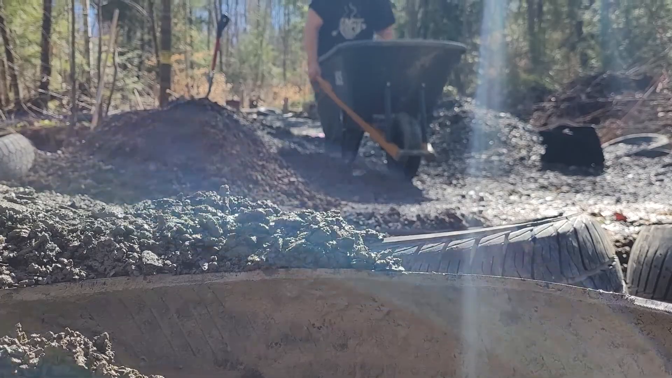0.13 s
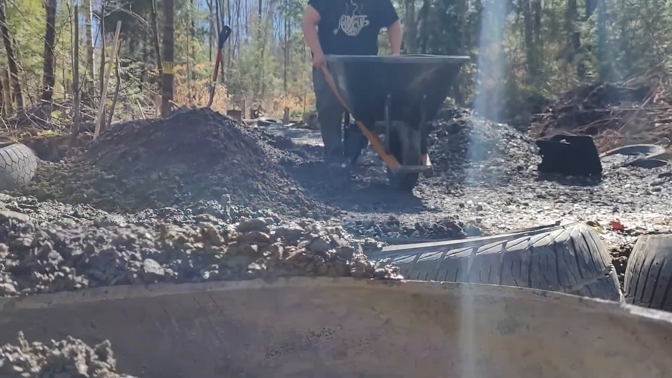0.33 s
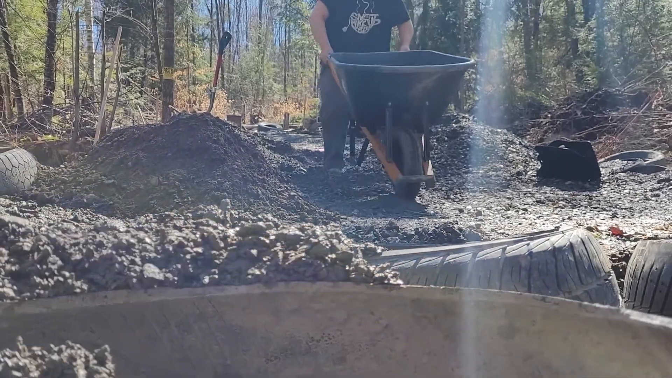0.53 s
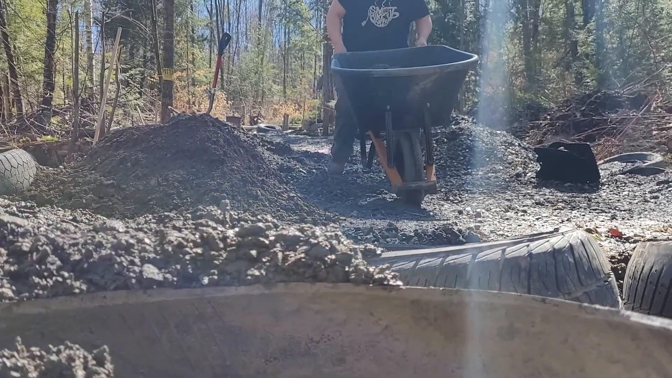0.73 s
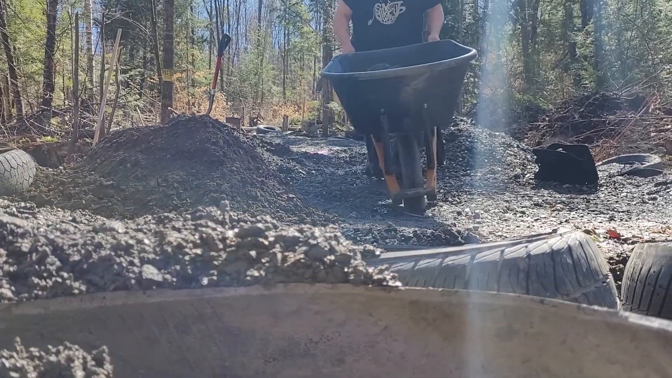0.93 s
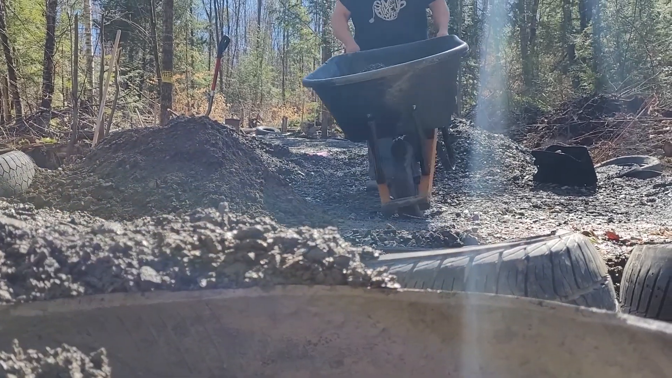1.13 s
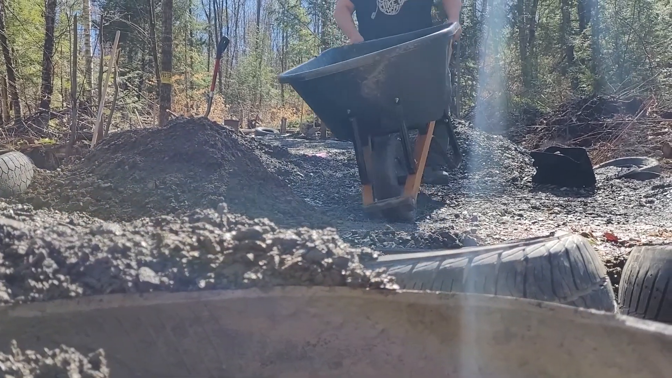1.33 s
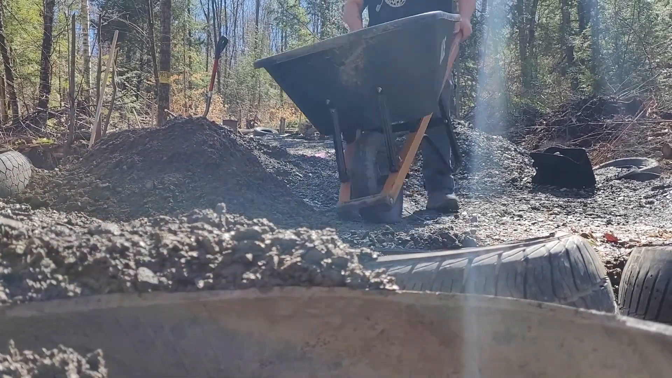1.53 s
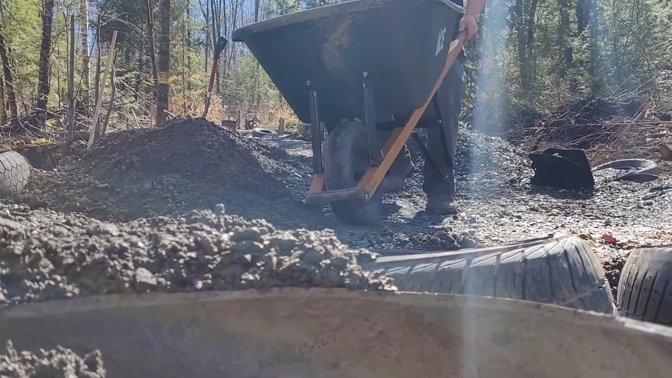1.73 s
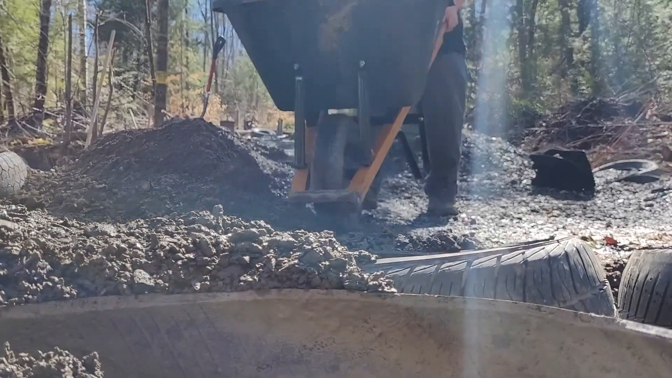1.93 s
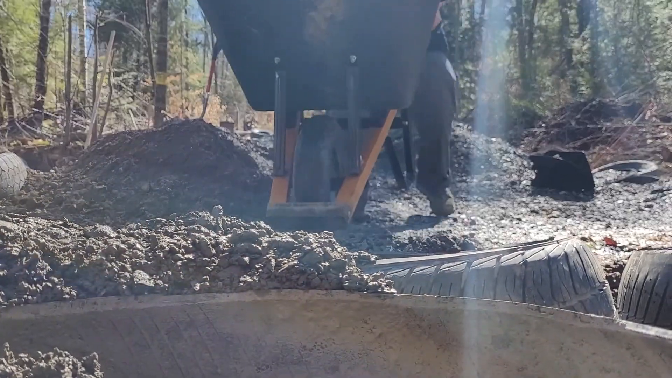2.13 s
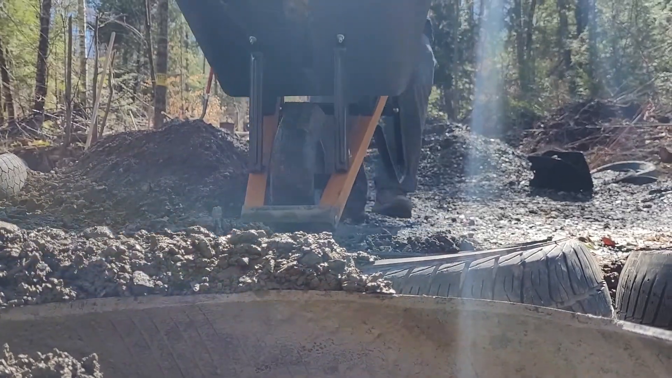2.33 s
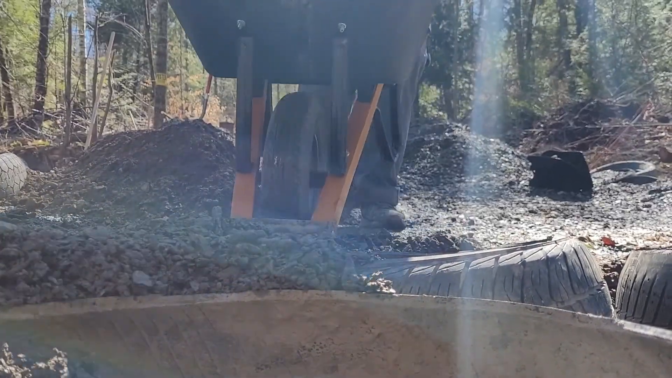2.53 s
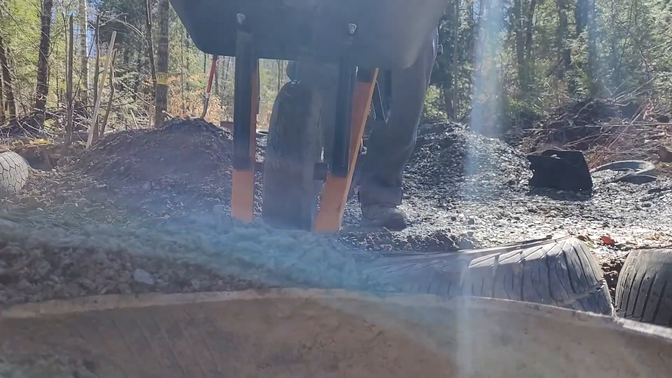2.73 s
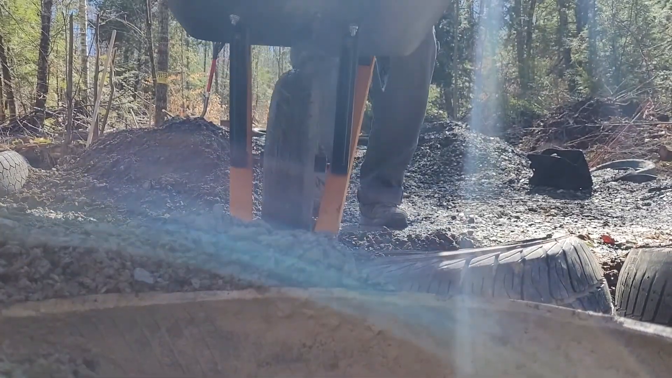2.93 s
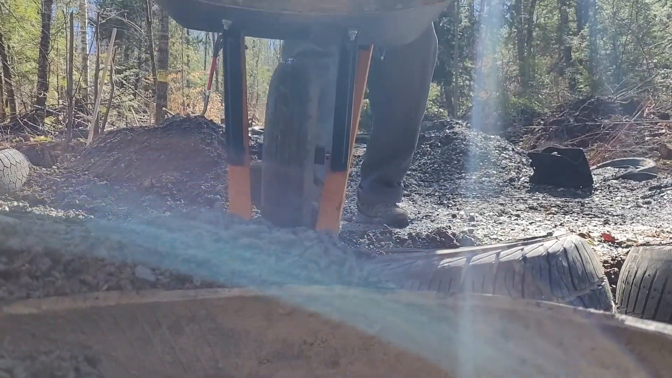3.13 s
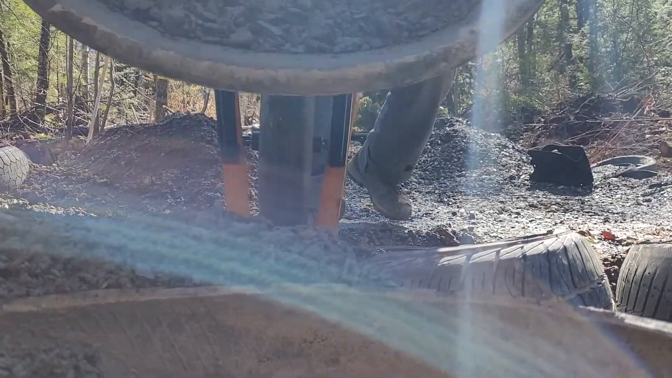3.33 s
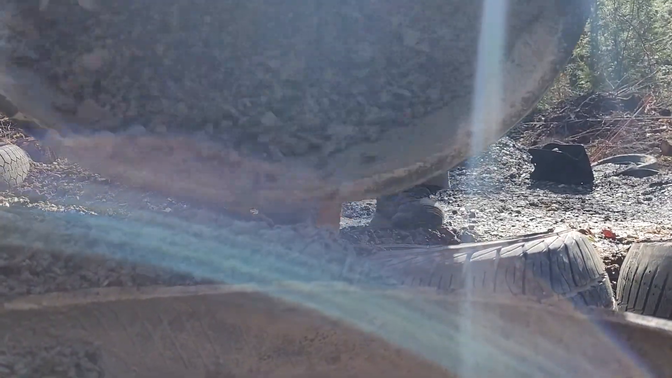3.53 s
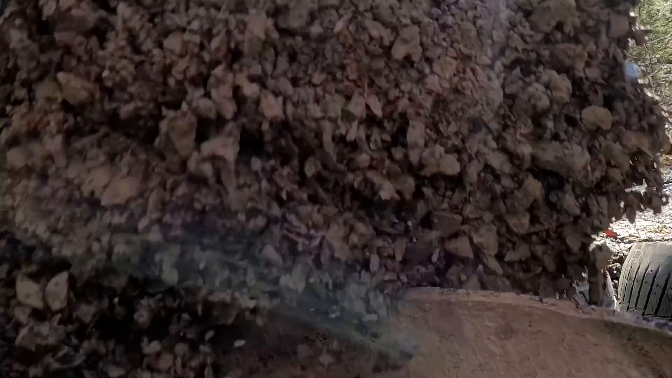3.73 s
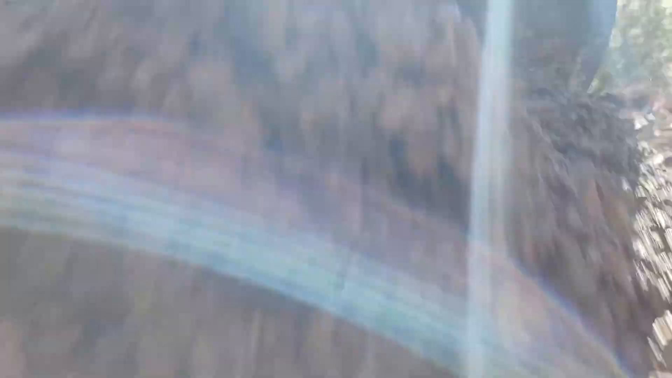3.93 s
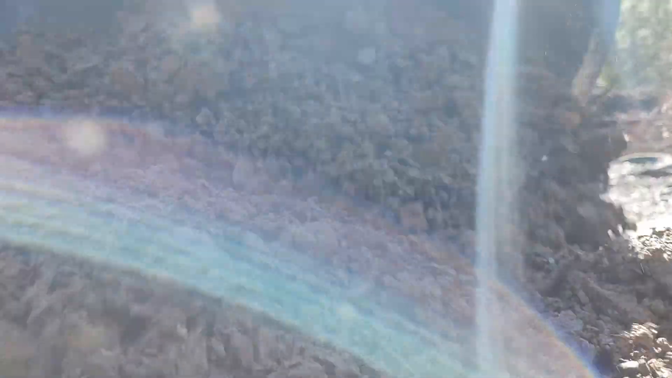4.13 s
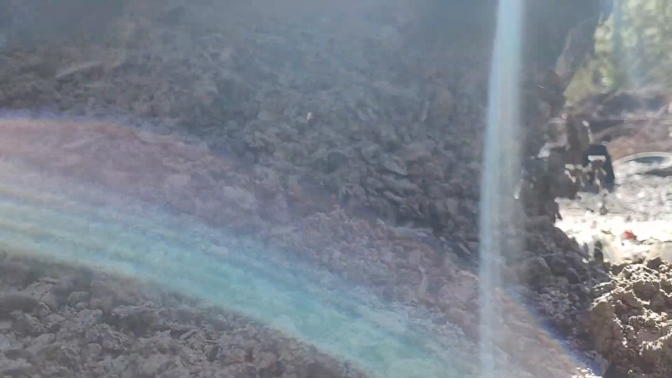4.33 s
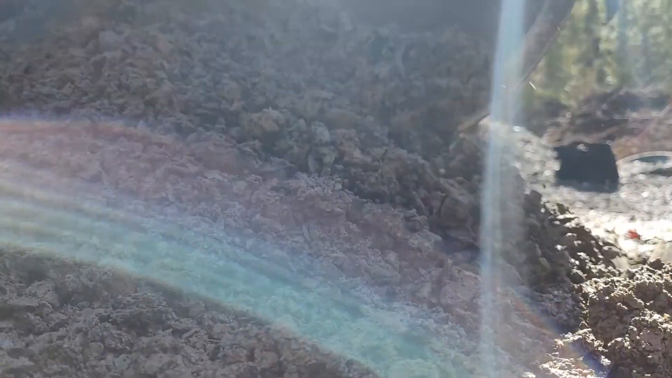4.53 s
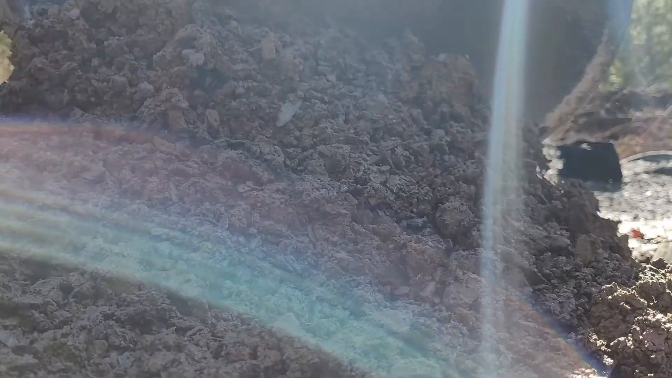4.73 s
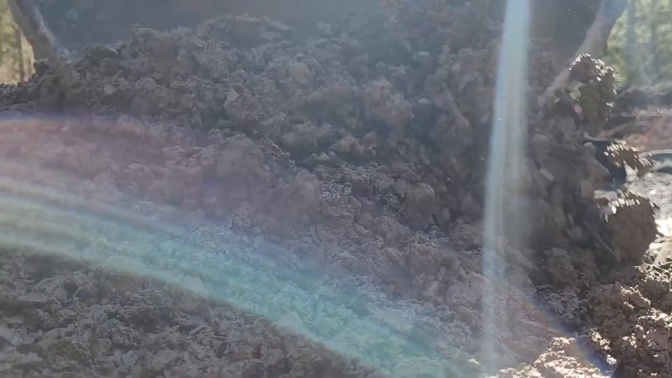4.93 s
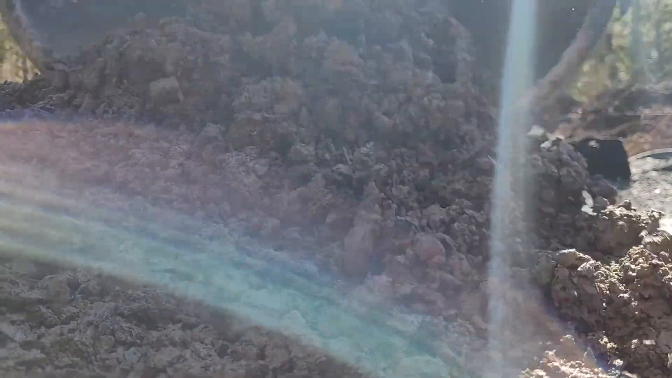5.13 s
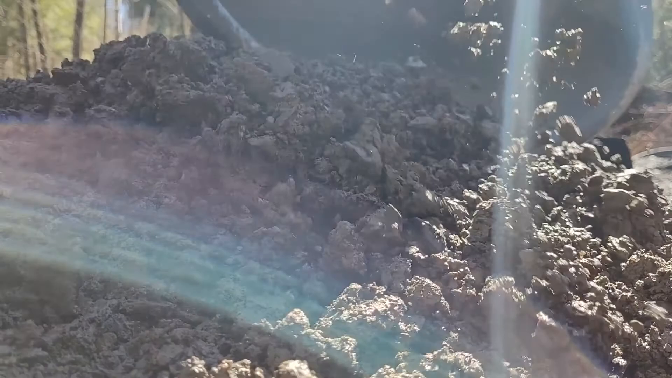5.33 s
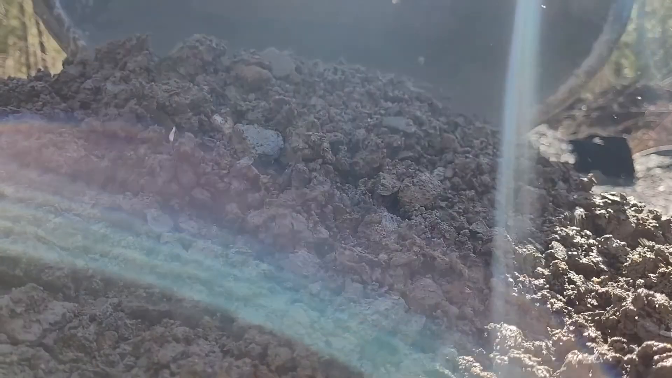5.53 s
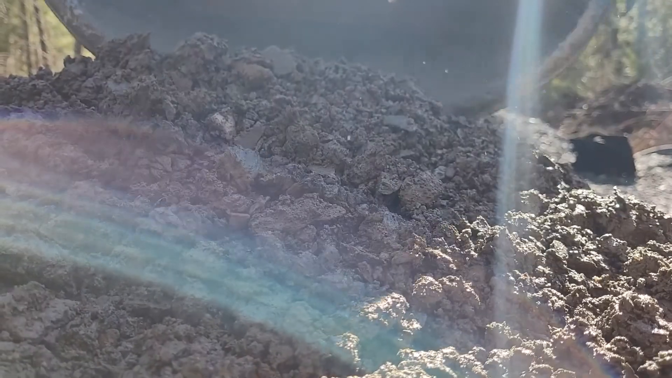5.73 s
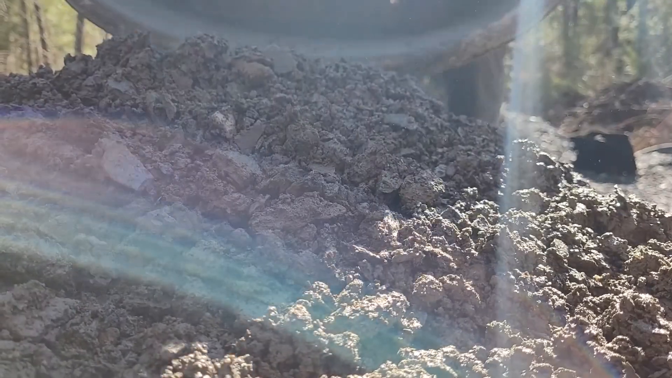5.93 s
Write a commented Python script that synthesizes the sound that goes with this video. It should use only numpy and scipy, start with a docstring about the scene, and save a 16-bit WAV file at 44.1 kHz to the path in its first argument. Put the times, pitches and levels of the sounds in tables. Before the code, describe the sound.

A loaded wheelbarrow crunches closer over gravel, then tips out stony soil with a loud clattering rush and is shaken empty.

```python
"""In quiet woods, a loaded wheelbarrow crunches over gravel towards a phone lying by a heap.
Single stones crack under tyre and boots while the load rattles in the plastic tub.
At about 3.5 s the barrow tips and pours: stones clatter, grit hisses, the tub drums, soil thuds down.
From about 4.3 s it is shaken empty in short slides, and a last trickle follows.
The phone's two microphones sit near the ground and each colours the treble differently."""
import sys
import numpy as np
from scipy import signal
from scipy.fft import rfft, irfft, next_fast_len
from scipy.io import wavfile

SR = 44100
rng = np.random.default_rng(int(sys.argv[2]) if len(sys.argv) > 2 else 0)


def file_out(sig):
    """Save sig as 16-bit WAV at sys.argv[1]."""
    # one column per channel
    cols = np.atleast_2d(sig).T
    # limit, then scale
    lim = np.clip(cols, -1, 1)
    pcm = np.round(lim * 32767).astype(np.int16)
    wavfile.write(sys.argv[1], SR, pcm)


N = 267951
TIME = np.arange(N) / SR
TIPPING_S = (3.45, 5)  # start and end of the change from upright to nose down

# the notes (modes) at which the upright, loaded tub rings: f/Hz, width/Hz, level/dB
TUB_MODES = [(145, 59, 19), (296, 39, 3), (859, 103, -4), (1406, 80, -5.5), (2230, 28, -28),
             (3150, 370, -3)]


def undb(db):
    """Turn decibels into a factor to multiply by."""
    return 10 ** (np.asarray(db) / 20)


def unit(x):
    """Scale a sound to an average power of 1."""
    return x / np.sqrt(np.mean(x ** 2))


def curves(rows):
    """Join the values in each column of a table by straight lines in time."""
    times, *columns = np.array(rows).T
    return np.array([np.interp(TIME, times, column) for column in columns])


def colour(x, points, modes=()):
    """Filter a sound by a curve of (f/Hz, level/dB) points, with ringing notes standing on top."""
    hz = np.maximum(np.fft.rfftfreq(8192, 1 / SR), 1)
    point_hz, point_db = np.array(points).T
    gain = undb(np.interp(np.log(hz), np.log(point_hz), point_db))
    for mode_hz, width, db in modes:
        if point_hz[1] <= mode_hz <= point_hz[-2]:
            gain = np.hypot(gain, undb(db) / (1 + (2 * (hz - mode_hz) / width) ** 2))
    # make the filter ring only after a knock, never before it
    cepstrum = irfft(np.log(gain))
    cepstrum[1:4096] *= 2
    cepstrum[4097:] = 0
    response = irfft(np.exp(rfft(cepstrum)))
    return signal.oaconvolve(x, response[None], axes=1)[:, :N]


def stereo_noise(alike, turn=0.):
    """Left and right noise; the share `alike` is common, its phase shifted `turn` radians on the left."""
    shared, left, right = rng.standard_normal((3, N))
    turned = irfft(rfft(shared, next_fast_len(N)) * np.exp(1j * turn))[:N]
    return np.sqrt(alike) * np.array([turned, shared]) + np.sqrt(1 - alike) * np.array([left, right])


def grains(rate, spread_db, tail_s, bed):
    """Loudness outline of uneven random knocks, `rate` a second, over a steady share `bed`."""
    lands = rng.random(N) < rate / SR
    size = undb(2 * spread_db * rng.exponential(size=N).clip(0, 5))
    power = lands * size / size.mean() * SR / rate
    decay = np.exp(-1 / (tail_s * SR))
    return np.sqrt(bed + (1 - bed) * signal.lfilter([1 - decay], [1, -decay], power))


def surges(table, rise_s, fall_s, round_top):
    """Power that swells, holds and fades; it is 20 dB down rise_s before and fall_s after the hold."""
    power = 0
    for start, length, *levels_db in table:
        away = np.maximum(start - TIME, 0) / rise_s + np.maximum(TIME - start - length, 0) / fall_s
        power = power + np.outer(undb(levels_db), undb(-20 * away ** round_top)) ** 2
    return power


def blows(table, ring_db, alike, rise_s, t60=None, q=None):
    """Noise bursts that set the tub ringing; each fades 60 dB in t60 s, and higher q is more pitched."""
    t = np.arange(8192) / SR
    out = np.zeros((2, N + len(t)))
    noises = rng.standard_normal((len(table), 3, len(t)))
    for (start, db, hz, pan_db, *own), noise in zip(table, noises):  # pan is left minus right
        push = np.sqrt(alike) * noise[0] + np.sqrt(1 - alike) * noise[1:]
        push = push * 1000. ** (-t / (t60 or own[0])) * np.minimum(t / rise_s, 1)
        sharpness = max(q or own[1], .2 + 2.6 * hz / SR)
        for _ in range(2):  # twice, to cut more away from the pitch
            push = signal.lfilter(*signal.iirpeak(hz, sharpness, SR), push)
        ring = sum(undb(mode_db) * signal.lfilter(*signal.iirpeak(f, f / width, SR), push)
                   for f, width, mode_db in TUB_MODES)
        hit = push + undb(ring_db) * ring
        hit /= np.abs(hit).max(axis=1, keepdims=True)
        first = int(start * SR)
        out[:, first:first + len(t)] += undb(db + np.array([[pan_db], [-pan_db]]) / 2) * hit
    return out[:, :N]


def woods():
    """The faint, steady hush of the woods."""
    # tone of the hush: f/Hz, level/dB
    hush = [(30, 1), (100, -22), (400, -4.5), (1500, -15), (5000, -22), (16000, -45)]
    return unit(colour(stereo_noise(0.3), hush)) * undb(-63.5)


def grit_ticks():
    """Grains of grit land next to the phone with tiny, bright ticks."""
    # landings: t/s, peak/dB, f/Hz, pan/dB
    ticks = [(0.5034, -51, 7400, 6.0), (0.7015, -46, 8160, 11), (0.9303, -42, 7740, 9),
             (1.0091, -42, 5600, 10), (1.1812, -37, 8190, 6.5), (1.1902, -32, 6650, 7),
             (1.3354, -40, 9700, 10), (1.4676, -34, 9430, 8), (1.488, -35, 5870, -2),
             (1.6183, -35, 6200, 1), (1.8285, -33, 7950, 7.0), (1.836, -30.5, 5770, 6),
             (1.9639, -34, 6000, 4.5), (2.0512, -39, 7080, 4.0), (2.297, -33, 5520, 3),
             (2.4523, -38, 7610, 4.5), (2.596, -32, 5700, 6.5), (2.9911, -42, 6160, 5.5),
             (3.009, -30, 6750, -1), (3.0154, -30, 14000, 0), (3.2313, -33, 7100, -1),
             (3.26, -30, 5470, 4.5), (3.301, -28.5, 7300, 2), (3.384, -30, 8050, 4.5),
             (3.412, -27, 5730, 4.5), (3.7623, -21, 5780, 7.5), (4.179, -25, 6970, -4.0),
             (4.1876, -23, 7540, -10), (4.2166, -26, 7100, -16), (4.2264, -29, 7400, -10),
             (4.2453, -26, 12000, -10), (4.2634, -35, 13600, -4), (4.3889, -36, 7300, -5),
             (4.906, -41, 5520, 1), (5.0973, -36, 12000, 4), (5.1163, -35, 5710, 1.5),
             (5.2525, -37, 12300, 3.5), (5.435, -30, 11600, 4), (5.508, -32, 6110, 5.5),
             (5.6181, -29.5, 11900, 7), (5.654, -42, 7870, 1.5), (5.7977, -43, 6660, -11),
             (5.826, -44, 13400, 3.0), (6.0135, -42, 7230, 4)]
    return blows(ticks, t60=0.017, q=1.04, ring_db=-26, alike=0.19, rise_s=0.00033)


def stone_snaps():
    """A single stone close by gives a very short, dry snap."""
    # snaps: t/s, peak/dB, f/Hz, pan/dB, t60/s, sharpness q
    snaps = [(.367, -22, 1500, -8, 0.0031, .45), (4.047, -15, 1270, -21, 0.0053, 1.2),
             (5.335, -12, 3580, 14, .006, 1.2)]
    return blows(snaps, ring_db=10, alike=1.0, rise_s=0.00053)


def low_blows():
    """Dull knocks hit tub and ground, and heavy masses land with a deeper, longer thud."""
    # dull knocks: t/s, peak/dB, f/Hz, pan/dB, t60/s
    thumps = [(0.38, -39.5, 272, 2.5, 0.1), (0.574, -50, 149, 0.5, 0.068), (0.67, -43.5, 266, 0.0, 0.046),
              (0.869, -45, 254, 2.0, 0.075), (0.968, -43.5, 170, 1.5, 0.059), (1.08, -33, 218, 1.5, 0.068),
              (1.267, -35.5, 192, 2, 0.036), (1.452, -31, 292, 6, 0.11), (1.55, -35, 143, 3, 0.09),
              (1.577, -39, 133, 0, 0.089), (2.061, -32, 400, 5, 0.09), (2.235, -40, 301, 7.5, 0.06),
              (2.26, -30.5, 272, -2, 0.066), (2.448, -42, 132, -1, 0.075), (2.894, -26.5, 288, 4, 0.037),
              (2.984, -32.5, 323, 6, 0.11), (3.103, -26.5, 285, 8, 0.068), (3.26, -24, 280, 6, 0.083),
              (3.779, -9.5, 297, 7, 0.06), (3.845, -34, 374, -5, 0.084), (4.033, -14.5, 266, 17, 0.069),
              (4.18, -23, 240, -2, 0.087), (4.623, -35, 159, 2.0, 0.082), (4.719, -28.5, 135, 0, 0.075),
              (4.858, -25, 164, 3, 0.062), (4.953, -34, 147, -6, 0.055), (5.14, -29, 160, 1.5, 0.055),
              (5.275, -12, 136, 1.0, 0.056), (5.471, -16.5, 173, 2.5, 0.066), (5.544, -25, 153, 1.0, 0.052),
              (5.872, -41, 153, 4, 0.075), (5.949, -35.5, 153, 1.0, 0.098)]
    # heavy landings: t/s, peak/dB, f/Hz, pan/dB
    thuds = [(.33, -57, 61, 12), (1.03, -50, 60.4, 3), (1.57, -38, 62.4, 2), (2.06, -42.5, 60, 7),
             (3.09, -38, 62.6, 8), (3.79, -32, 60.4, -6), (4.03, -17.5, 64, 11), (4.07, -23.5, 71.6, 15),
             (5.02, -34, 62.7, 0), (5.18, -25, 63, 5), (5.29, -24.5, 64, 0), (5.47, -24, 60, 2)]
    return (blows(thumps, q=1.94, ring_db=-35, alike=0.69, rise_s=0.005)
            + blows(thuds, t60=0.32, q=1.7, ring_db=-11, alike=1.0, rise_s=0.005))


def stone_cracks():
    """Stones crack under tyre and boots or on the heap."""
    # cracks: t/s, peak/dB, f/Hz, pan/dB, t60/s, sharpness q
    cracks = [(0.181, -47.5, 1450, 4, 0.023, 0.79), (0.382, -32, 1380, 5, 0.03, 0.62),
              (0.552, -43, 1180, 5, 0.032, 1.3), (0.579, -37, 886, 3, 0.061, 0.68),
              (0.617, -37.5, 890, 7, 0.02, 0.77), (0.666, -43, 746, -1, 0.03, 1.2),
              (0.828, -37.5, 2800, -3, 0.038, 2.4), (0.872, -40, 1500, 7, 0.028, 1.2),
              (1.009, -39, 1520, 4, 0.023, 1), (1.036, -25, 1270, 3, 0.02, 0.96),
              (1.076, -28.5, 886, 5, 0.019, 0.8), (1.085, -23, 1410, 2.0, 0.031, 1.6),
              (1.12, -36, 1380, 2.0, 0.025, 1.2), (1.145, -32, 1440, 4, 0.022, 1.2),
              (1.178, -31, 2300, 0.0, 0.025, 1.8), (1.19, -23.5, 1510, 4, 0.025, 0.96),
              (1.267, -24, 2080, -1, 0.026, 1.3), (1.275, -27, 2180, 2.0, 0.028, 0.69),
              (1.338, -30.5, 1580, -2, 0.023, 1.2), (1.456, -25, 1370, 5, 0.042, 2.3),
              (1.466, -25, 1330, 8, 0.025, 2.6), (1.541, -42, 2490, -4, 0.025, 1.3),
              (1.574, -31, 1460, 1.0, 0.034, 0.89), (1.824, -36, 1410, 4, 0.025, 1.2),
              (1.964, -40, 1390, -2, 0.025, 0.88), (2.082, -26.5, 1450, 3.0, 0.041, 1.2),
              (2.119, -31.5, 1420, -3, 0.013, 1.5), (2.168, -30, 1900, 2.0, 0.025, 1.4),
              (2.231, -35, 1430, 2.5, 0.022, 1.8), (2.273, -26, 1010, 5, 0.029, 1.1),
              (2.329, -28.5, 960, 8, 0.025, 1.2), (2.384, -31, 930, 3.5, 0.025, 1),
              (2.491, -30, 2330, -4, 0.024, 2), (2.545, -20.5, 1380, 1.0, 0.01, 1.8),
              (2.595, -36, 3380, -8, 0.025, 1.4), (2.753, -26.5, 1420, 2, 0.02, 1.4),
              (2.774, -30.5, 1320, 2.0, 0.029, 1.4), (2.895, -35, 1220, 1, 0.025, 1),
              (3.008, -36, 3110, 1, 0.021, 1.4), (3.105, -22, 1200, 6, 0.025, 0.44),
              (3.269, -27, 770, 5, 0.038, 0.94), (3.37, -19.5, 1380, 8, 0.016, 0.71),
              (4.317, -21, 851, 2.5, 0.023, 1.2), (5.052, -26.5, 746, 3, 0.044, 1),
              (5.127, -23.5, 890, 4, 0.023, 1.5), (5.364, -20, 785, 0, 0.035, 1),
              (5.451, -39, 848, -1, 0.025, 1.1), (5.481, -16.5, 826, 0, 0.023, 0.69),
              (5.592, -31, 700, 7, 0.038, 2), (5.617, -31, 876, 3, 0.025, 0.66),
              (5.651, -34.5, 905, -6, 0.025, 0.51), (6.035, -39, 759, 1.0, 0.022, 1.1)]
    return blows(cracks, ring_db=4.5, alike=0.72, rise_s=0.0018)


def scrapes(knocks):
    """Gravel rubbing along the tub makes one narrow note sing for each scrape."""
    # scrapes: t/s, length/s, level/dB, f/Hz
    strokes = [(1.03, .16, -52, 1450), (1.315, 0.045, -49.5, 1510), (1.846, 0.13, -48.5, 1410),
               (2.062, .06, -49, 1440), (2.268, 0.078, -46.5, 945), (2.703, 0.052, -49, 1380),
               (4.275, 0.15, -32.5, 828), (4.512, 0.11, -32, 750)]
    rub = knocks * stereo_noise(0.65, 0.27)
    out, width_hz = 0, 98
    for *stroke, hz in strokes:
        note = unit(signal.lfilter(*signal.iirpeak(hz, hz / width_hz, SR), rub))
        out = out + note * np.sqrt(surges([stroke], rise_s=0.032, fall_s=0.064, round_top=1))
    return out


def tub(x, tone):
    """The tub rings with a sound; its notes change as it tips and the load leaves it."""
    # its notes when nose down on the heap: f/Hz, width/Hz, level/dB
    tipped_modes = [(149.3, 55, 16), (251, 23, -23), (417, 180, 2.5), (600, 210, 12), (731, 37, 14),
                    (882, 290, 11), (1504, 63, -8.5), (2940, 87, 4)]
    tipped = np.interp(TIME, TIPPING_S, (0, 1))
    return (1 - tipped) * unit(colour(x, tone, TUB_MODES)) + tipped * unit(colour(x, tone, tipped_modes))


def gravel_flow():
    """How loud stones, grit, tub walls, tub belly and frame are over time, in dB."""
    # steady movement: t/s, stones/dB, grit/dB, walls/dB, belly/dB, frame/dB
    rolling = [(.1, -81, -66, -71, -80, -81), (.28, -75, -72, -66, -70, -68),
               (.45, -62.5, -66, -65, -65, -72), (.53, -62, -64, -69, -82, -84),
               (.75, -57.5, -63, -58.5, -60, -67), (.9, -57.5, -59, -68, -67, -72),
               (1.0, -55, -57, -77, -73, -75), (1.27, -54, -60, -65, -69, -65),
               (1.5, -53.5, -55, -70, -59, -63), (1.75, -51.5, -50.5, -64.5, -59, -63.5),
               (2.2, -54.5, -55, -56, -60, -59), (2.4, -53.5, -52, -53.5, -50, -52.5),
               (2.85, -52.5, -50.5, -62, -53.5, -67), (3.2, -56.5, -48, -54, -50, -47)]  # the load rattles as the barrow nears
    pouring = [(3.34, -48.5, -46, -49, -41, -48), (3.422, -40, -40, -45, -36.5, -48.5),
               (3.502, -20.5, -23.5, -25, -24.5, -44.5), (3.65, -19.5, -22.5, -27, -28.5, -38),
               (3.7, -20.5, -29.5, -33, -31.5, -40.5), (3.8, -27, -25, -23, -17.5, -34),
               (3.87, -29.5, -17.5, -22.5, -21, -36), (4.008, -23.5, -18.5, -21.5, -20.5, -32),
               (4.05, -31.5, -30, -26, -19, -32), (4.091, -35, -33.5, -32, -30, -23),
               (4.16, -36.5, -43, -32.5, -41.5, -50), (4.23, -36, -41, -30.5, -39, -39)]  # it slides out and lands
    trickle = [(4.47, -39, -64, -35.5, -44, -42.5), (4.54, -37.5, -54, -34, -43.5, -40),
               (4.7, -40, -53, -34, -39.5, -45), (4.87, -44, -60, -36, -55, -45.5),
               (5.03, -62, -41, -39, -39, -36), (5.09, -72, -55, -56, -44, -39),
               (5.23, -60.5, -73, -35, -42, -26.5), (5.41, -61, -77, -66, -38, -45),
               (5.56, -56, -50.5, -48, -43.5, -35), (5.68, -57.5, -60, -51.5, -48, -42),
               (5.8, -61, -58, -47, -49, -38.5), (5.9, -62, -61, -50.5, -56, -46),
               (6.07, -60, -58, -53, -50, -48)]  # it dribbles between and after the shakes
    # short surges: t/s, length/s, stones/dB, grit/dB, walls/dB, belly/dB, frame/dB
    crunches = [(.57, 0.069, -67.5, -75, -55, -53, -56), (.82, 0.017, -55, -56, -57, -75, -78),
                (.92, 0.059, -52, -58, -54, -57, -63), (1.0, 0.17, -49, -55, -51.5, -48.5, -58.5),
                (1.18, 0.087, -49.5, -50, -52, -56, -66), (1.3, 0.058, -48, -49, -52.5, -50, -65),
                (1.39, 0.034, -51, -55, -58, -59, -63), (1.44, 0.037, -53, -57, -44.5, -49, -50),
                (1.53, 0.066, -48, -61, -54, -46, -50), (1.61, 0.055, -51, -49, -58, -56, -61),
                (1.82, 0.028, -50, -51, -67, -52, -64), (1.87, 0.13, -49, -60, -59, -64, -66),
                (2.04, 0.063, -42.5, -48, -56, -53, -53.5), (2.165, 0.024, -45, -50, -55, -67, -66),
                (2.235, 0.094, -45.5, -48, -49, -41.5, -50), (2.45, 0.12, -45, -47, -50, -45.5, -51.5),
                (2.54, 0.059, -40, -40, -45, -39, -58), (2.63, .16, -47.5, -45.5, -54, -41.5, -56),
                (2.985, 0.037, -49.5, -47, -55, -47, -53), (3.105, 0.045, -50.5, -56, -54, -41.5, -55),
                (3.22, 0.079, -46.5, -47, -53, -41, -47.5)]  # tyre and boots crunch the gravel and jolt the load
    shakes = [(4.29, 0.12, -37, -63, -38.5, -45, -42), (4.56, 0.094, -34, -49, -37.5, -50, -41),
              (4.76, 0.061, -28.5, -33.5, -36, -51, -34), (4.93, 0.058, -28.5, -32, -35.5, -39, -30.5),
              (5.13, 0.053, -37, -32, -34, -34.5, -30), (5.27, 0.063, -40.5, -34.5, -34, -31.5, -29),
              (5.365, 0.013, -48, -55, -35.5, -39, -34), (5.45, 0.035, -41, -45, -33, -37, -31)]  # each shake of the handles sends gravel sliding out
    steady = undb(curves(rolling + pouring + trickle)) ** 2
    crunching = surges(crunches, rise_s=0.015, fall_s=0.097, round_top=0.49)
    shaking = surges(shakes, rise_s=0.045, fall_s=0.051, round_top=1.07)
    shaking[1] = np.roll(shaking[1], -int(0.0054 * SR))  # the grit comes first
    shaking[-1] = np.roll(shaking[-1], int(0.011 * SR))  # the frame comes last
    return 10 * np.log10(steady + shaking + crunching)


def moving_gravel():
    """Stones and grit sound in the air and drum the tub; heavy knocks shake belly, frame and ground."""
    # the tone of each part: f/Hz, level/dB
    stone_tone = [(900, -13.5), (1600, -9.5), (2200, 1.5), (3000, -2), (4500, -10.5), (5500, -8.5),
                  (7000, -13), (10000, -59)]  # clatter
    grit_tone = [(3000, 3), (5500, 2), (6500, -1), (8000, 2), (10500, -9), (13000, -2), (15500, -7),
                 (18000, 1.5)]  # hiss
    wall_tone = [(350, -26), (550, -11), (1050, -10), (1500, -32)]  # hollow drumming
    rim_tone = [(800, -35), (1150, -11), (1750, -11), (2600, -32)]  # higher rattle
    belly_tone = [(120, -26), (210, -3), (400, -2.5), (520, -12.5), (800, -34)]  # low drumming
    frame_tone = [(60, -42), (105, 4.5), (200, 9.5), (300, -41)]  # boom
    ground_tone = [(20, -44), (45, -10), (60, 6), (90, -7), (140, -67)]  # deep rumble
    rasp_tone = [(2500, -35.5), (3600, 0.5), (4600, 0.5), (5500, -7), (7500, -34)]  # stones grating at speed

    stones_db, grit_db, walls_db, belly_db, frame_db = gravel_flow()
    rim_db = 0.73 * stones_db + 0.27 * walls_db - 1.5
    ground_db = frame_db + np.interp(TIME, TIPPING_S, (-6, -8.5))
    rasp_db = -27 + 1.31 * (stones_db + 20)  # grows faster than the clatter

    rate = 600. * undb(.55 * (stones_db + 52))  # a louder rush is more stones, so more knocks a second
    knocks = grains(rate, spread_db=2.5, tail_s=0.0064, bed=0.08)
    fine = grains(2.1 * rate, spread_db=0.5, tail_s=0.00015, bed=0.1)
    heavy = grains(0.19 * rate, spread_db=1.0, tail_s=0.0039, bed=0.34)

    stones = tub(knocks * stereo_noise(0.076, 0.27), stone_tone) * undb(stones_db)
    grit = unit(colour(np.sqrt(knocks * fine) * stereo_noise(0.0092), grit_tone)) * undb(grit_db)
    walls = tub(knocks * stereo_noise(0.58, 0.48), wall_tone) * undb(walls_db)
    rim = tub(knocks * stereo_noise(0.3, 0.19), rim_tone) * undb(rim_db)
    belly = tub(heavy * stereo_noise(0.52, 0.3), belly_tone) * undb(belly_db)
    frame = tub(heavy * stereo_noise(1.0, 0.17), frame_tone) * undb(frame_db)
    ground = unit(colour(heavy * stereo_noise(0.56, 0.68), ground_tone)) * undb(ground_db)
    rasp = unit(colour(knocks * stereo_noise(0.06), rasp_tone)) * undb(rasp_db)
    drumming = scrapes(knocks) + walls + rim + belly + frame + ground

    # where the sound sits, left minus right: t/s, stones/dB, tub/dB
    place = [(.1, 5.5, 4.5), (1.2, 2.5, 2.5), (1.8, 4, 3), (3.4, 6.5, 3.5), (3.75, 7.5, 4.5),
             (3.87, 4.5, -3), (4.01, 12, 0.5), (4.06, 4.5, 13), (4.2, 1, -0.5), (4.5, 4.5, 3),
             (5.4, 2.5, 2.5), (6.07, 1.5, 3)]
    stone_pan, tub_pan = curves(place)
    sides = np.array([[.5], [-.5]])
    return (stones + rasp + grit) * undb(sides * stone_pan) + drumming * undb(sides * tub_pan)


def scene():
    """Single blows, the moving gravel and the quiet woods together."""
    return stone_cracks() + low_blows() + stone_snaps() + grit_ticks() + moving_gravel() + woods()


def record(dry):
    """The phone colours each side, opens after a short silence, rounds loud peaks and cuts the top."""
    # how the two microphones differ in tone: f/Hz, left minus right/dB
    balance = [(60, 0), (130, -2.5), (300, 0.5), (700, -0.5), (1400, -1), (2400, -5), (4500, 7.5),
               (6500, -5), (7800, 2.5), (9000, 4.5), (11000, 3.5), (13000, -3), (15000, 3.5)]
    left = colour(dry[:1], [(hz, db / 2) for hz, db in balance])
    right = colour(dry[1:], [(hz, -db / 2) for hz, db in balance])
    start_s, fade_s, top_hz = 0.1, 0.0047, 15900
    opened = np.clip((TIME - start_s) / fade_s, 0, 1)
    rounded = np.tanh(np.vstack([left, right]) * opened)
    return signal.sosfilt(signal.ellip(12, .2, 80, top_hz, fs=SR, output="sos"), rounded)


dry = scene()
out = record(dry)
file_out(out)
```